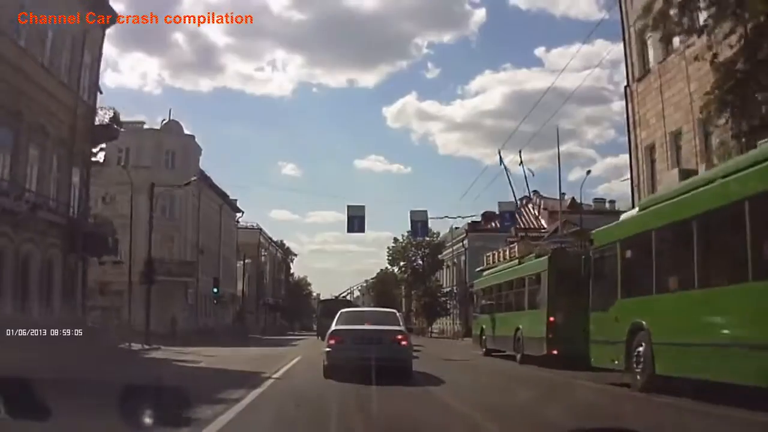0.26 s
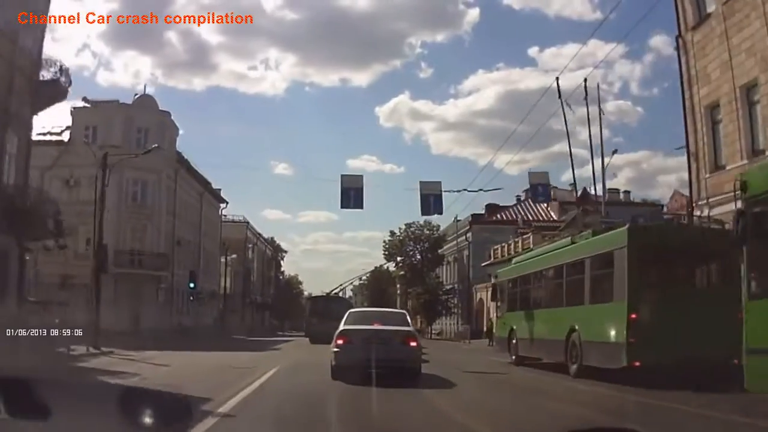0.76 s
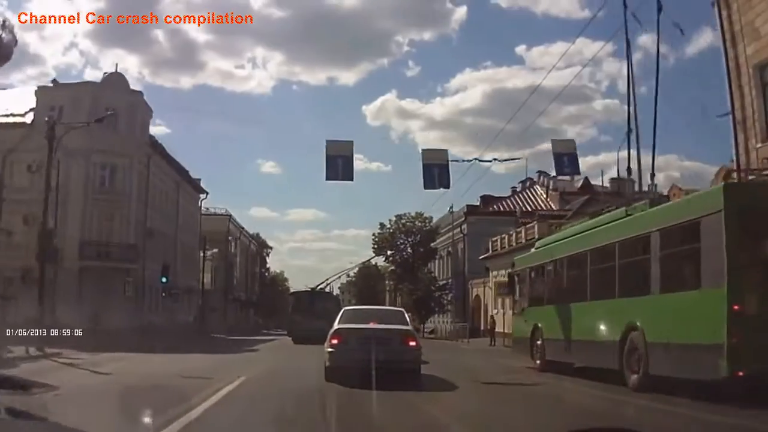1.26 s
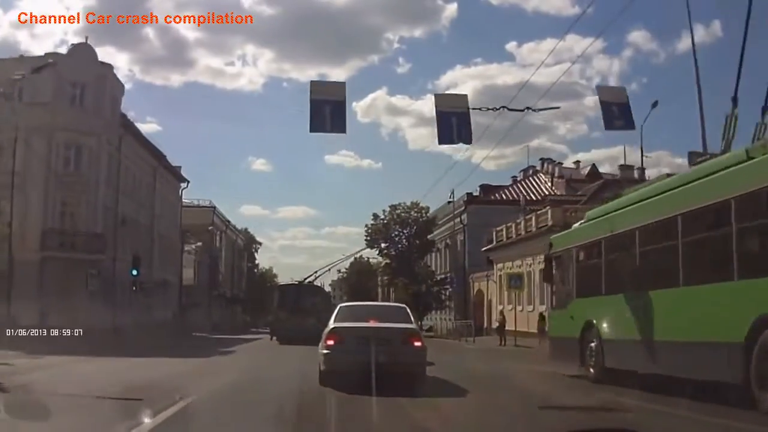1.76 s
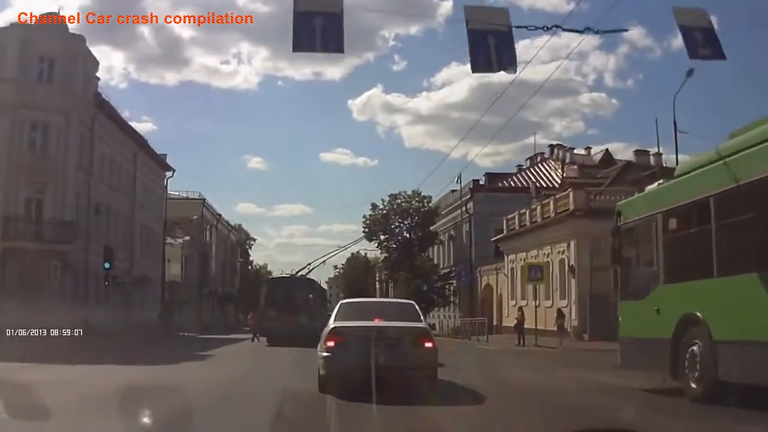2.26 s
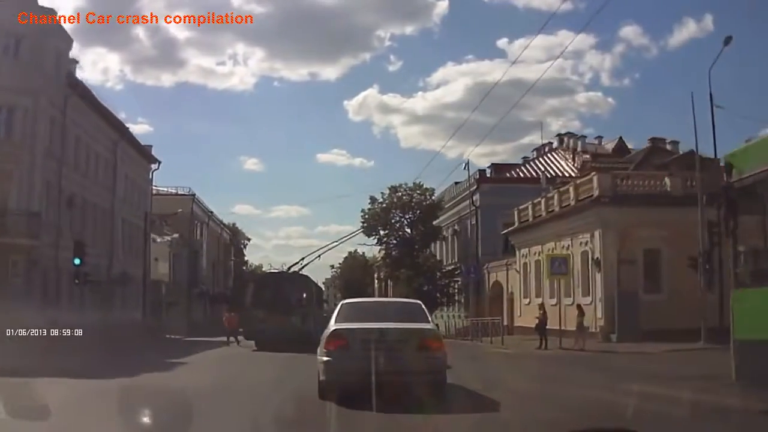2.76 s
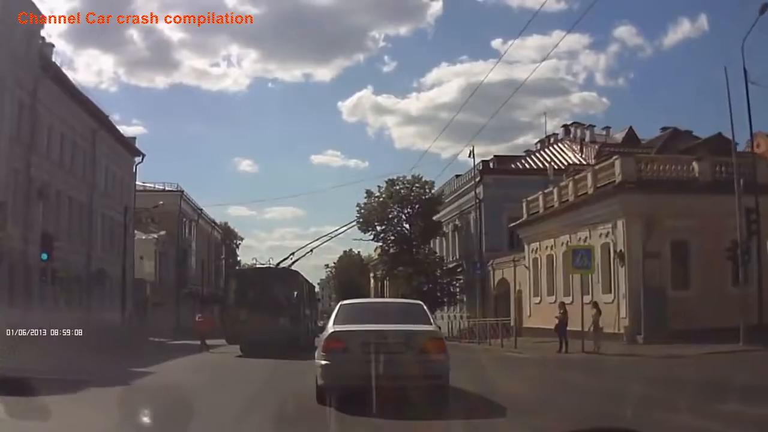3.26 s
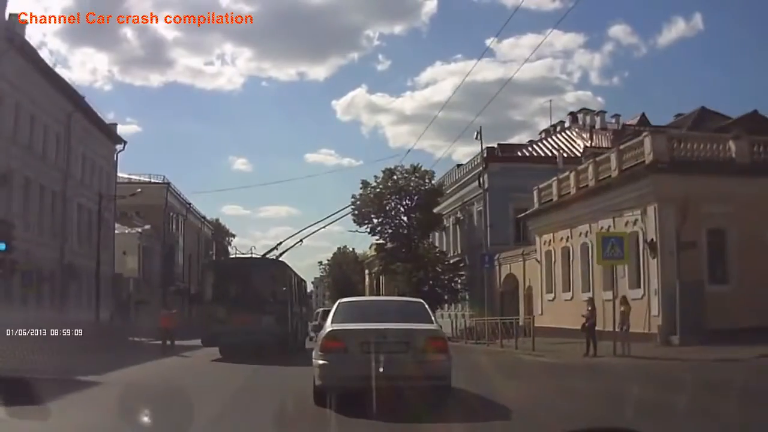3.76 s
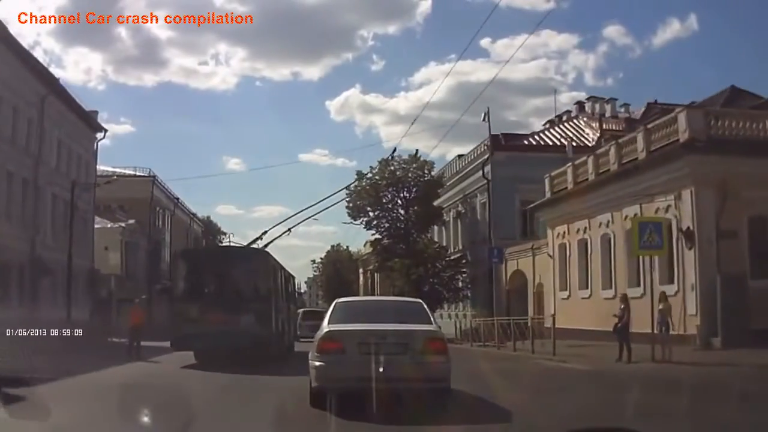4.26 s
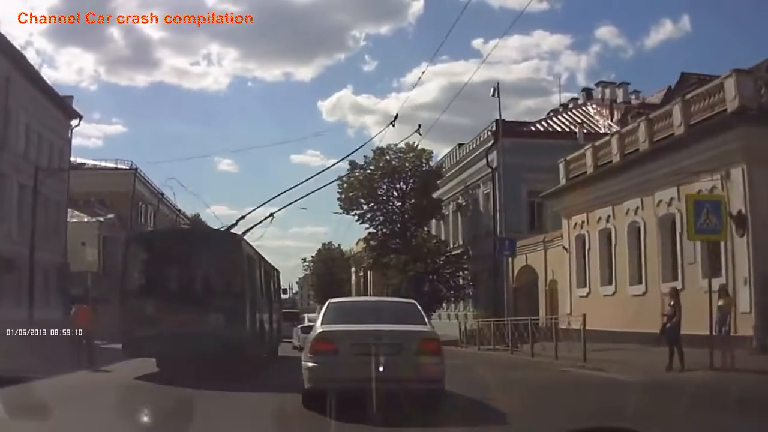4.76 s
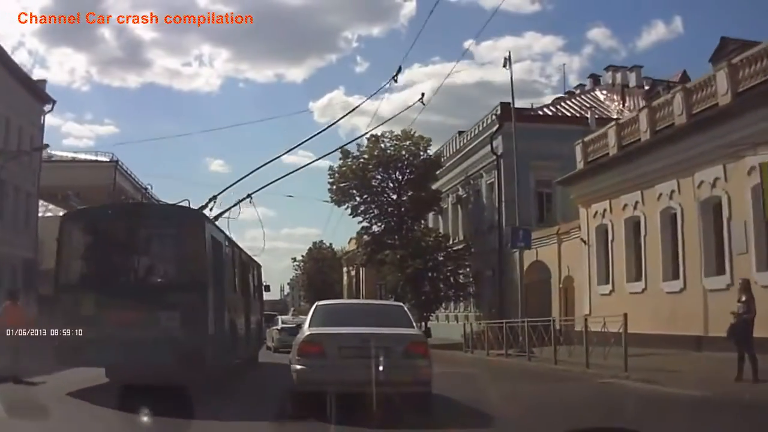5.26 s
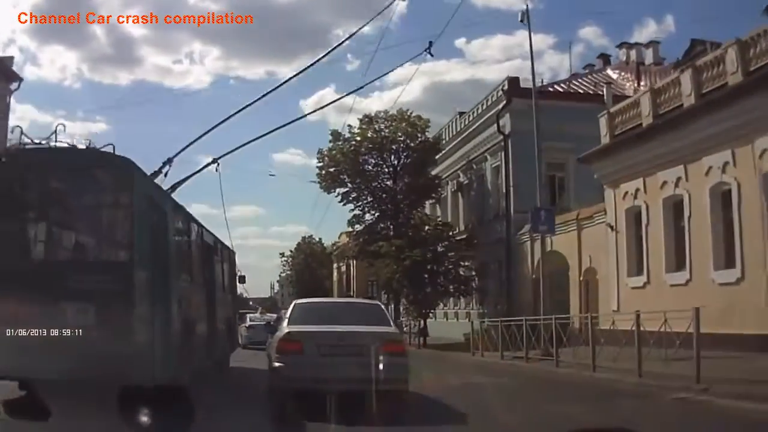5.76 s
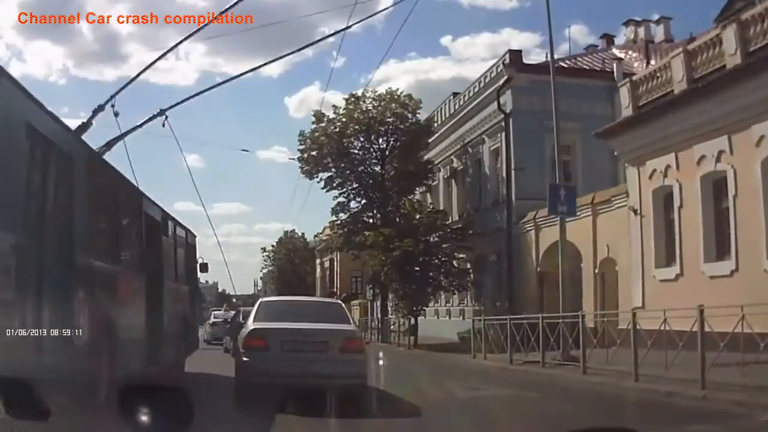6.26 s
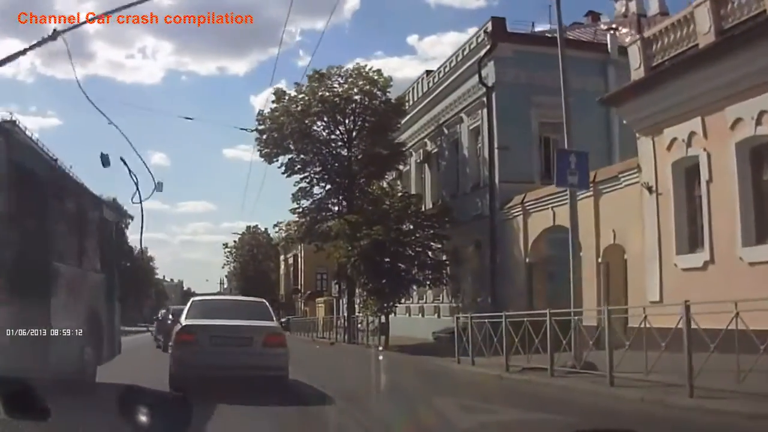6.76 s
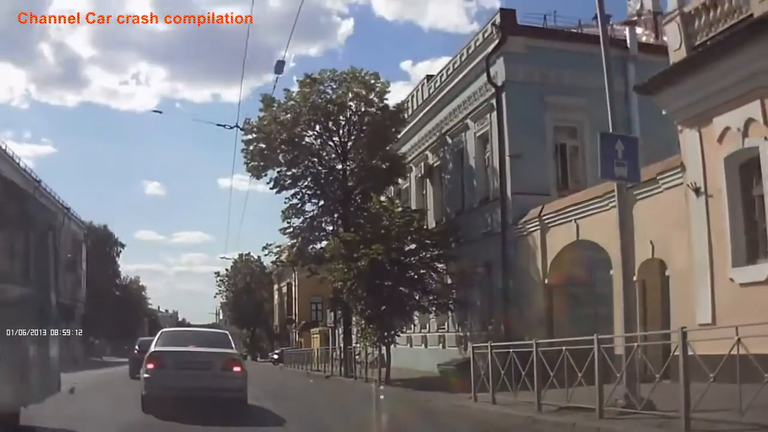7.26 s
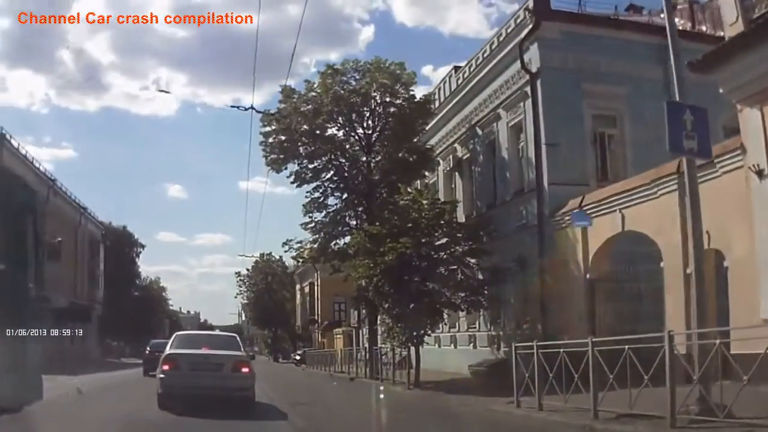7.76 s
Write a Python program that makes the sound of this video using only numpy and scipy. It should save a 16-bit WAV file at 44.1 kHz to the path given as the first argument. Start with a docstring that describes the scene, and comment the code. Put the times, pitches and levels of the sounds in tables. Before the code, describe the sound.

Heard inside a moving car, a short crunch gives way to booming, crackly rumble, faint turn signal ticks and later metallic bangs.

```python
"""Inside a car driving through town, heard by a small camera on the windscreen. The sound opens on a harsh
burst of crunching metal and glass that stops short after some 60 ms. The engine booms and the bumpy road
rumbles in the cabin, hard enough to work the camera's limiter and make it crackle. From 2.5 s the turn signal
ticks faintly; near 3 s the engine shifts up, later running down. Outside, at 4.3 s and again from 6.6 s, the
poles of a trolleybus clash with the overhead wires, and loose fittings bang and clatter."""
import sys
import numpy as np
from scipy import signal
from scipy.fft import rfft, irfft, next_fast_len
from scipy.io import wavfile
from scipy.ndimage import uniform_filter1d, map_coordinates

SR = 44100
rng = np.random.default_rng(int(sys.argv[2]) if len(sys.argv) > 2 else 0)


def transcribe(signal):
    """Save signal, clipped to [-1, 1], as a 16-bit WAV file at the path in sys.argv[1]."""
    frames = np.atleast_2d(signal).T
    limited = np.clip(frames, -1, 1)
    pcm = np.round(limited * 32767).astype(np.int16)
    wavfile.write(sys.argv[1], SR, pcm)


N = 353241

# microphone hiss EQ: frequency_hz, gain_db
HISS_EQ = [(1000, -8), (2000, 0.5), (2800, 6), (3600, 0.5), (4800, 4), (6000, -4.5), (6900, 4),
           (7500, -5.5), (8500, -0.5), (11500, -12.5), (13000, -4), (14500, -2.5)]
# faint electronic tones: pitch_hz, level_db
WHINE_TONES = [(7150, -76), (10430, -74.5)]
# the sharpest clicks of the crackle: time_s, relative_level_db, treble_db
CRACKLE_CLICKS = [(.25, -33, -9.5), (.34, -34.5, -8.5), (.41, -27, -2), (.5044, -16, -1.5),
                  (.5705, -39, -12), (.666, -28, -10), (0.6982, -37, -1), (0.7302, -34.5, -9),
                  (.752, -35, -2.5), (0.762, -32.5, -1.5), (0.794, -28.5, -8.5), (.89, -31, -0.5),
                  (.9543, -28.5, -8.5), (.963, -30, -5), (1.0186, -34, -10), (1.1145, -36.5, -8),
                  (1.1464, -31, -16.5), (1.299, -36, -10), (1.382, -33, -11), (1.412, -35, -5.5),
                  (1.591, -26, -5), (1.6256, -34, -3), (1.786, -26.5, -0.5), (1.823, -36.5, -4),
                  (1.844, -35.5, -2.5), (1.992, -36, -18.5), (2.0647, -33, -10), (2.092, -34, -11.5),
                  (2.111, -34.5, -11), (2.1415, -35.5, -10.5), (2.266, -31.5, -9.5), (2.5567, -36, -4),
                  (2.5847, -35, -8.5), (2.7766, -27.5, -0.5), (2.9245, -34.5, -8.5), (2.9653, -42, -10.5),
                  (3.77, -36, -9), (4.53, -38, -9), (4.718, -36, -8), (4.7301, -30.5, -9), (4.762, -34, -6),
                  (4.785, -32.5, -8), (4.9541, -30.5, -7), (4.966, -30.5, -12), (4.986, -33.5, -0.5),
                  (5.051, -28.5, -6), (5.06, -35, -5.5), (5.182, -37, -9.5), (5.274, -32, -4.5),
                  (5.3673, -40.5, -5.5), (5.402, -40.5, -10), (5.421, -31.5, -14), (5.4477, -33.5, -9.5),
                  (5.562, -34, -14), (5.658, -35.5, -11.5), (5.6923, -33.5, -7), (5.758, -37, -5.5),
                  (5.818, -38.5, -11.5), (5.833, -34, -3), (5.9782, -31, -10), (5.99, -33.5, -13),
                  (6.106, -28.5, -5.5), (6.115, -38.5, -7.5), (6.44, -38, -10.5), (7.109, -35.5, -13),
                  (7.2902, -27.5, -2.5), (7.322, -31, -8), (7.336, -36, -6.5), (7.386, -25.5, -16),
                  (7.405, -31, -13)]
# spells of fine crackle: centre_s, relative_level_db, half_length_s
CRACKLE_SPELLS = [(0.535, -45, .04), (0.744, -48, 0.12), (1.367, -48, 0.089), (1.628, -45, 0.028),
                  (1.83, -46.5, 0.065), (2.092, -42.5, 0.033), (2.297, -49, .05), (2.569, -43.5, 0.039),
                  (2.78, -49.5, 0.03), (4.766, -45.5, 0.054), (5.024, -50.5, 0.055), (5.175, -40.5, 0.016),
                  (5.335, -47.5, .1), (5.53, -48, 0.026), (5.762, -49.5, 0.2), (6.068, -49.5, 0.078),
                  (6.503, -45.5, .02), (7.313, -44.5, 0.059)]
# resonances of the turn signal relay's case: pitch_hz, width_hz, gain_db
RELAY_MODES = [(2750, 130, 6), (3900, 300, -6.5), (4720, 120, -2), (5700, 100, -1)]
# faders for the road surface and the final slowing: time_s, drone_db, roar_db, shake_db, tyre_air_db
ROAD_FADERS = [(0, -15.5, -34, -19, -40), (.6, -16.5, -35.5, -17.5, -36.5), (1.1, -16, -34.5, -18, -31.5),
               (1.45, -17, -36, -19.5, -31.5), (2.3, -15, -35.5, -17, -28.5), (3.1, -17, -35, -16, -34),
               (3.7, -19, -35.5, -21.5, -49.5), (4.1, -20, -35, -21, -40), (4.4, -19, -34.5, -20, -36.5),
               (5.25, -18, -38.5, -17.5, -41.5), (5.65, -19.5, -36.5, -14.5, -37),
               (6.3, -17, -34.5, -16, -35.5), (6.85, -16.5, -34, -19, -38.5), (7.25, -22, -37, -15, -38),
               (7.55, -23, -35.5, -15.5, -40.5), (8.0, -27.5, -36.5, -18, -40)]
# body shake EQ: frequency_hz, gain_db
SHAKE_EQ = [(10, -11.5), (19, -6), (27, 1.5), (36, -5.5), (46, -2.5), (54, -3.5), (62, -8.5), (90, -24),
            (200, -85.5)]
# air resonances of the cabin: pitch_hz, width_hz, gain_db
CABIN_MODES = [(64.4, 9.05, -1), (79.35, 6, 0), (98.44, 7.1, 0), (139.9, 16.7, -2.5), (169.7, 17.9, -4.5),
               (200.7, 37, -12.5), (314, 93, -19.5)]
# tyre roar EQ: frequency_hz, gain_db
ROAR_EQ = [(190, -39), (330, -1.5), (371, -10), (457, -7), (494, -10.5), (727, -10), (849, -12),
           (1040, -12.5), (1220, -13.5), (1360, -16), (1740, -34), (2100, -44), (2730, -50), (4620, -120)]
# bumps in the road: centre_s, level_db
ROAD_BUMPS = [(.49, -12.5), (2.551, -10), (4.48, -21), (4.88, -16.5), (5.17, -12)]
# the engine pulls, shifts up, then runs down: time_s, firing_rate_hz, boom_db
ENGINE_MOVES = [(0, 46.15, -16), (.55, 41.07, -13), (.85, 41.98, -6), (1.27, 43.56, -3.5),
                (1.45, 44.11, -14.5), (1.95, 41.41, -7), (2.3, 44.67, -15.5), (2.7, 40.85, -13),
                (3.0, 33.48, -18.5), (3.65, 32.6, -26.5), (4.25, 32.06, -20), (5.35, 33.93, -9.5),
                (5.9, 32, -15.5), (7.3, 26.52, -16.5), (8.0, 24.3, -26)]
# EQ of the crunch's fractures: frequency_hz, gain_db
FRACTURE_EQ = [(150, -4.5), (300, -3.5), (560, -2), (1100, -8), (2000, -13), (2700, -14.5), (3900, -11.5),
               (5300, -16), (6400, -14), (9000, -19), (11000, -23.5), (14500, -30.5)]
# a ringing panel and glass splinters: pitch_hz, width_hz, gain_db
DEBRIS_MODES = [(439, 23, 16.5), (560, 40, 13), (672, 37, 5.5), (2160, 25, 0.5), (3150, 40, -1),
                (3450, 32, -2.5), (6350, 130, 2), (9640, 130, -2), (10400, 120, -3), (12000, 80, -3.5)]
# modes of the long steel pole: pitch_hz, level_db, t60_s
POLE_MODES = [(2362, -4, 0.13), (2830, -2, 0.13), (3120, -2, 0.12), (3400, 1, 0.11), (4100, -11, .25),
              (4650, -11, .43), (4850, -13, .3), (6000, -5, .1), (6900, -9, .1)]
# modes of the small collector shoe at its tip: pitch_hz, level_db, t60_s
SHOE_MODES = [(3570, -4, 0.12), (4090, -4, .1), (4420, -6, .11), (4710, -9, 0.19), (5000, -2, .1),
              (5160, -3, .09), (5180, -3, .1), (6130, -8, .11), (6400, -4, 0.12), (8060, -6, 0.067)]
# steel chatter EQ: frequency_hz, gain_db
CHATTER_EQ = [(800, -9), (2000, -5.5), (3300, 1.5), (5000, -2.5), (6400, -5), (8500, -10.5), (10500, -15),
              (12500, -33)]
# EQ of a knock heard through the car's shell: frequency_hz, gain_db
KNOCK_EQ = [(150, -8), (350, 2.5), (600, 1.5), (900, 0), (1350, 2), (1900, -21.5), (4000, -57)]
# hits on the trolley gear:
# start_s, chatter_db, ring_db, ring_hz, knock_db, t60_s, rise_s, clang_db, part_struck
TROLLEY_HITS = [(4.260, -44.5, -45.5, 4618, -48, .17, .008, -50, "shoe"),
                (4.274, -39.5, -39, 4500, -24, .08, .004, -39.5, "shoe"),
                (4.310, -43.5, -50.5, 4900, -34, .11, .003, -46, "shoe"),
                (6.592, -42.5, -46, 2050, -31, .25, 0.0077, -55, "pole"),
                (6.624, -38.5, -58, 5600, -37, .097, .005, -55, "shoe"),
                (6.648, -48.5, -46, 2500, -40, .12, .005, -56, "pole"),
                (6.712, -49.5, -21.5, 373, -32, 0.31, 0.011, -56, "pole"),
                (6.748, -47, -11, 230, -36, .09, .006, -60, "pole"),
                (6.773, -28, -29.5, 3250, -20, .08, .008, -31.5, "pole"),
                (6.800, -43.5, -42.5, 3930, -24.5, .2, .005, -49, "pole"),
                (6.813, -44, -21, 850, -26, .08, .004, -44, "shoe"),
                (6.826, -44.5, -45, 4600, -36, 0.055, .002, -49, "shoe"),
                (6.862, -51, -50, 3500, -41, .2, .006, -56, "pole"),
                (6.915, -55, -56, 4670, -42, .88, 0.0091, -49, "pole"),
                (7.01, -58.5, -59, 4600, -42.5, 1, .011, -56, "pole"),
                (7.055, -56, -52, 3000, -35, .12, .005, -58, "pole"),
                (7.362, -47.5, -58, 4520, -44, 0.27, .005, -55, "shoe"),
                (7.415, -56, -35, 890.4, -37, 0.22, 0.01, -59, "pole"),
                (7.444, -37, -18, 900, -17.5, .055, .005, -46, "pole"),
                (7.460, -60, -39, 1200, -33, 0.21, .005, -60, "pole"),
                (7.634, -49, -29, 750, -31, .12, .006, -52, "shoe"),
                (7.759, -59.5, -56.5, 4346, -54, .4, .008, -58, "shoe"),
                (7.795, -57, -52, 7000, -56, .2, .008, -60, "shoe"),
                (7.814, -39.5, -37, 7100, -50, .024, .0013, -49, "shoe"),
                (7.87, -49, -59, 6450, -47, .09, .002, -50, "shoe")]


def amp(db):
    """Decibels to gain."""
    return 10 ** (np.asarray(db) / 20)


def unit(x):
    """Normalised to rms 1."""
    return x / np.sqrt(np.mean(x ** 2) + 1e-20)


def curves(rows):
    """An automation lane, one value per sample, for each column after the time."""
    s, *cols = np.transpose(rows)
    return [np.interp(np.arange(N) / SR, s, c) for c in cols]


def wobble(rate):
    """A smooth random modulator, rate knots a second."""
    return map_coordinates(rng.standard_normal(int(N * rate / SR) + 4), [np.arange(N) * rate / SR])


def filtered(x, response):
    """x played through a frequency response."""
    n = x.shape[-1]
    m = next_fast_len(n + SR // 4)
    return irfft(rfft(x, m) * response(np.fft.rfftfreq(m, 1 / SR)), m)[..., :n]


def colour(points):
    """An EQ curve through (frequency_hz, gain_db) points on a log axis."""
    f, db = np.transpose(points)
    return lambda hz: amp(np.interp(np.log(hz + 1), np.log(f + 1), db))


def resonances(modes):
    """The causal response of a bank of (pitch_hz, width_hz, gain_db) resonators."""
    return lambda f: sum((-1) ** k * amp(db) * 1j * f * width / (hz * hz - f * f + 1j * f * width)
                         for k, (hz, width, db) in enumerate(modes))


def noise(response, size=N):
    """Coloured noise of rms 1."""
    return unit(filtered(rng.standard_normal(size), response))


def grains(rate, scatter_db, size=N):
    """Random impulses of uneven strength, rate a second."""
    present = rng.random(size) < rate / SR
    return present * rng.choice([-1, 1], size) * amp(scatter_db * rng.uniform(-0.11, 1, size))


def add(track, s, sound):
    """Mixes a sound into a track from time s."""
    part = track[max(round(s * SR), 0):][:len(sound)]
    part += sound[:len(part)]


def electronics():
    """A steady bed of microphone hiss with a thin, wavering whine."""
    whine = sum(amp(db) * np.sin(2 * np.pi * np.cumsum(hz + 12 * wobble(40)) / SR)
                for hz, db in WHINE_TONES)
    return amp(-57.5) * noise(colour(HISS_EQ)) + np.sqrt(2) * whine


def overload_crackle(swing, strain):
    """Tiny signal jumps in the overloaded camera: cued clicks and spells, and a spray on the crests."""
    clicks, t = np.zeros(N), np.arange(N) / SR
    impulse = signal.unit_impulse(SR // 50, "mid")
    lag = (np.arange(len(impulse)) - len(impulse) // 2) / SR
    splutter_shape = amp(-23) * np.exp(-np.abs(lag) / 0.0047)
    for s, db, treble_db in CRACKLE_CLICKS:
        splutter = splutter_shape * grains(rate=2300, scatter_db=10.0, size=len(lag))
        click_eq = colour([(200, -6), (900, 1.5), (6500, -0.5), (9000, treble_db)])
        click = filtered(impulse + splutter, click_eq)
        add(clicks, s + lag[0], amp(db + 8.0) * rng.choice([-1, 1]) * click)
    spells = sum(amp(db) * np.exp(-((t - s) / half_s) ** 2) for s, db, half_s in CRACKLE_SPELLS)
    dense = swing * spells * unit(grains(rate=800, scatter_db=6.0))
    spray = strain * amp(-49.5 + wobble(11)) * unit(grains(rate=600, scatter_db=2.5))
    jumps = clicks + amp(-1) * (dense + spray)
    steps = signal.lfilter([1], [1, -np.exp(-1 / (0.0014 * SR))], jumps)  # each jump relaxes at once
    return filtered(steps, colour([(2000, -1.5), (7000, -1.5), (14000, -2.5)]))


def turn_signal(start_s=2.486, cycle_s=.739, on_s=.345, clicks=5):
    """A relay ticks behind the dashboard, dropping out a touch louder than it pulls in."""
    out, t = np.zeros(N), np.arange(SR // 10) / SR
    attack = 1 - np.exp(-t / 0.0024)
    for k in range(clicks):
        cycle, drops_out = divmod(k, 2)
        decay = amp(-46 + drops_out - 60 * t / 0.071)
        tick = attack * decay * noise(resonances(RELAY_MODES), size=len(t))
        add(out, start_s + cycle * cycle_s + drops_out * on_s, tick)
    return out


def road(hum_hz=141):
    """The road shakes the body and rings the air in cabin and tyres; the tread roars through the glass."""
    drone_db, roar_db, shake_db, tyre_air_db = curves(ROAD_FADERS)
    shake = amp(shake_db + 3.5) * noise(colour(SHAKE_EQ))
    muffle = colour([(30, -34), (60, 4.0), (350, 1.5), (600, -4.5), (1500, -50.5), (3000, -65.0)])
    drone = amp(drone_db + 1.5) * noise(lambda hz: resonances(CABIN_MODES)(hz) * muffle(hz))
    hum_phase = 2 * np.pi * np.cumsum(hum_hz + 6 * wobble(9)) / SR  # the drone's strongest note
    hum = np.sqrt(2) * amp(drone_db - 13 + 3.5 * wobble(18)) * np.sin(hum_phase)
    tyre_air = amp(tyre_air_db) * noise(lambda hz: resonances([(243, 22, 0)])(hz) ** 2)
    roar = amp(roar_db + 1.45 + .7 * wobble(40)) * noise(colour(ROAR_EQ))
    return shake + drone + hum + tyre_air + roar


def bumps(body_hz=102.3, half_length_s=0.058):
    """Each bump in the road makes the body boom briefly on one low note."""
    t = np.arange(N) / SR
    swell = sum(amp(db) * np.exp(-((t - s) / half_length_s) ** 2) for s, db in ROAD_BUMPS)
    return np.sqrt(2) * swell * np.sin(2 * np.pi * np.cumsum(body_hz + 4 * wobble(10)) / SR)


def engine(octave_db=-13.5):
    """The low end: the firing rate and its octave boom in the cabin, a little unsteadily."""
    firing_hz, boom_db = curves(ENGINE_MOVES)
    phase = 2 * np.pi * np.cumsum(firing_hz * (1 + 0.014 * wobble(12))) / SR
    boom = amp(boom_db + 1.95 * wobble(8.3)) * np.sin(phase)
    octave = amp(boom_db + octave_db + 1.8 * wobble(6.0)) * np.sin(2 * phase)
    return np.sqrt(2) * (boom + octave)


def shards():
    """Dense fractures, with a panel and splinters of glass ringing among them."""
    fractures = unit(filtered(grains(rate=12000, scatter_db=2.5), colour(FRACTURE_EQ)))
    return fractures + amp(-5.0) * noise(resonances(DEBRIS_MODES))


def crunch(hold_s=0.055, sag_db_per_s=114.5, release_db_per_s=1199):
    """A harsh burst of crunching metal and glass with a little stereo width; it sags, then stops short."""
    t = np.arange(N) / SR
    envelope = amp(-13.5 - sag_db_per_s * t - release_db_per_s * np.maximum(t - hold_s, 0))
    mid = shards()
    side = amp(-7.0) * np.array([[1], [-1]]) * shards()
    return envelope * (mid + side)


def clang(modes, t, blur_hz=110):
    """Struck steel rings in its modes; loose parts keep rattling, blurring each into a noise band."""
    pitches_hz, levels_db, t60s = np.transpose(modes)
    gains = amp(levels_db + rng.normal(0, 1.5, levels_db.shape))
    out = np.zeros(len(t))
    for pitch_hz, gain, t60_s in zip(pitches_hz, gains, t60s):
        ring = noise(lambda hz: resonances([(pitch_hz, blur_hz, 0)])(hz) ** 2, size=len(t))
        out += gain * amp(-60 * t / t60_s) * ring
    return out / np.linalg.norm(gains)


def trolley_clashes(street_db=-24.0, street_t60_s=1.0):
    """Each hit layers steel chatter, a broad ring, a dull knock and the clang of the struck part."""
    out, t = np.zeros(N), np.arange(SR // 2) / SR
    modes = {"pole": POLE_MODES, "shoe": SHOE_MODES}
    for start_s, chatter_db, ring_db, ring_hz, knock_db, t60_s, rise_s, clang_db, part in TROLLEY_HITS:
        contacts = grains(rate=12000, scatter_db=13.0, size=len(t))
        chatter = amp(chatter_db) * unit(filtered(contacts, colour(CHATTER_EQ)))
        ring_band = resonances([(ring_hz, .17 * ring_hz, 0)])
        ring = amp(ring_db) * noise(lambda hz: ring_band(hz) ** 2, size=len(t))
        knock = amp(knock_db) * noise(colour(KNOCK_EQ), size=len(t))
        attack = 1 - np.exp(-(t / rise_s) ** 2)
        decay = amp(-60 * t / t60_s)
        street_tail = amp(street_db - 60 * t / street_t60_s)
        impact = (decay + street_tail) * (chatter + ring + knock)
        add(out, start_s, attack * (impact + amp(clang_db) * clang(modes[part], t)))
    return out


def scene():
    """The mix: everything sits dead centre except the crunch."""
    return crunch() + engine() + road() + bumps() + trolley_clashes() + turn_signal() + electronics()


def limiter(x, ceiling_db, release_db_per_s):
    """Fast attack, steady release: the boom ducks all else, and big swings crackle."""
    over_db = 20 * np.log10(np.maximum(np.abs(x).max(axis=0) / amp(ceiling_db), 1))
    recovery_db = release_db_per_s * np.arange(N) / SR
    cut_db = np.maximum.accumulate(over_db + recovery_db) - recovery_db
    limited = x * amp(-uniform_filter1d(cut_db, size=24))
    swing = np.abs(limited).max(axis=0) / amp(ceiling_db)
    # the spray fades in over the first 0.5 dB of cut and ducks 1.5 dB for each dB of cut
    strain = swing * np.minimum(cut_db / 0.5, 1) * amp(-1.5 * cut_db)
    return limited + overload_crackle(swing, strain)


def record(dry):
    """The camera limits the peaks and keeps nothing above its band limit."""
    return filtered(limiter(dry, ceiling_db=-3.5, release_db_per_s=37.0), lambda hz: hz < 14550)


dry = scene()
out = record(dry)
transcribe(out)
```